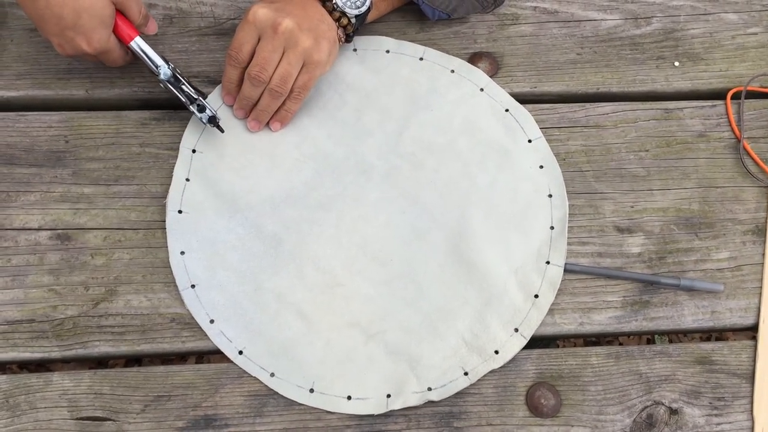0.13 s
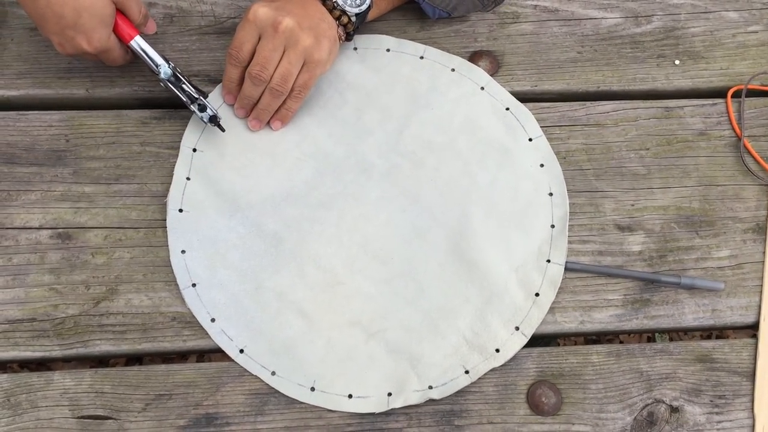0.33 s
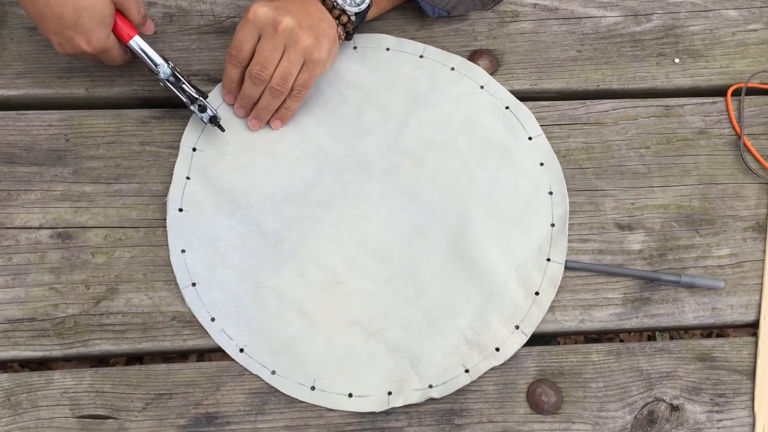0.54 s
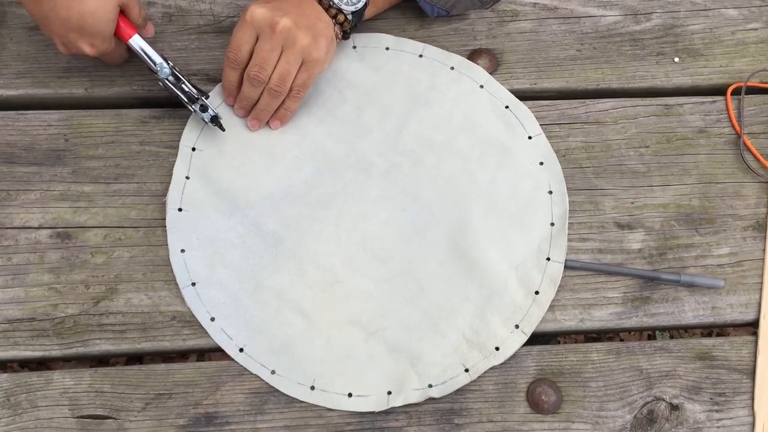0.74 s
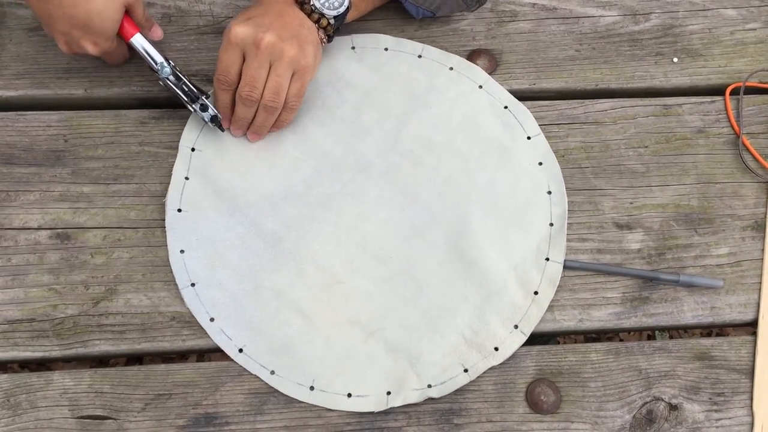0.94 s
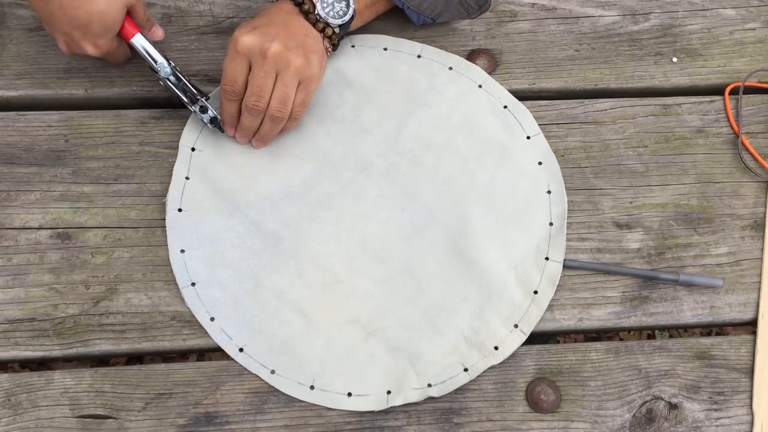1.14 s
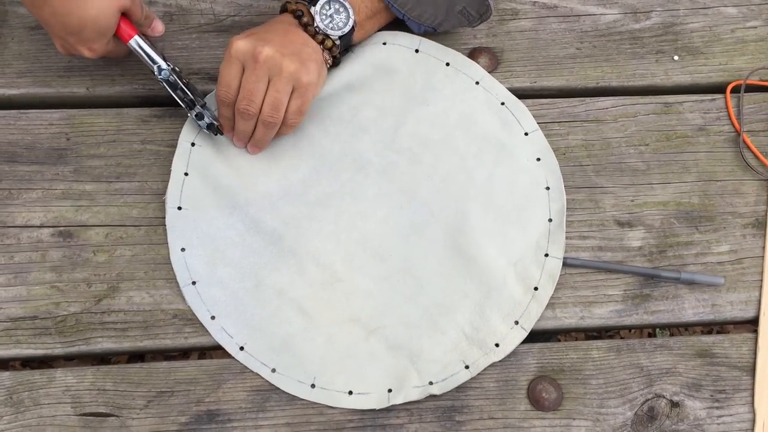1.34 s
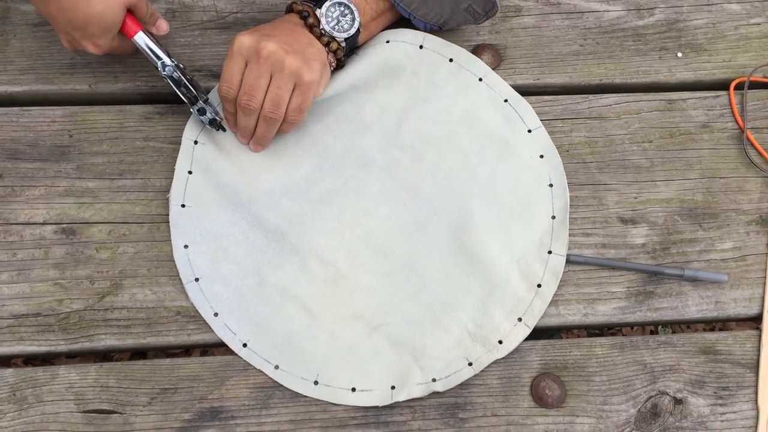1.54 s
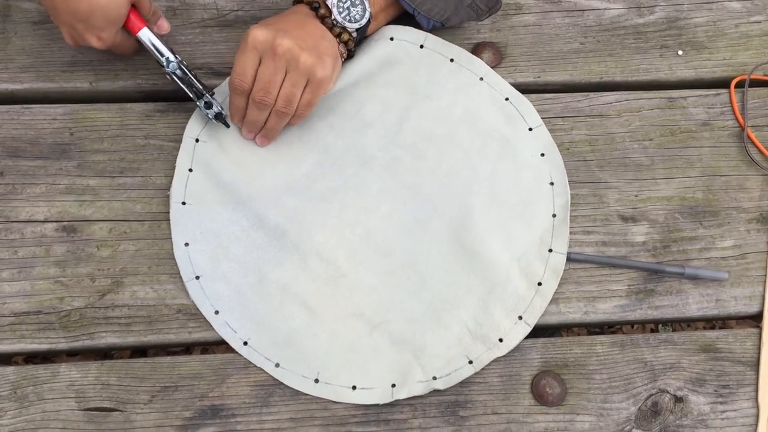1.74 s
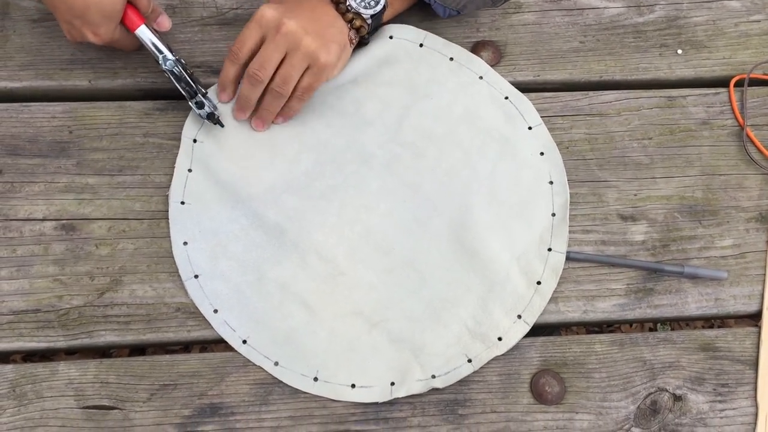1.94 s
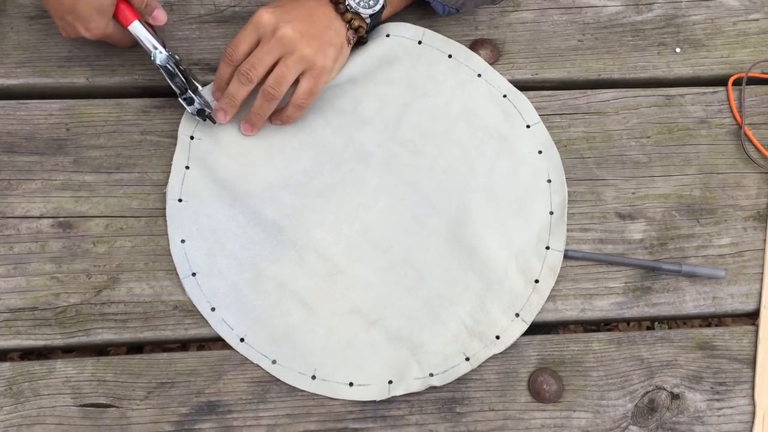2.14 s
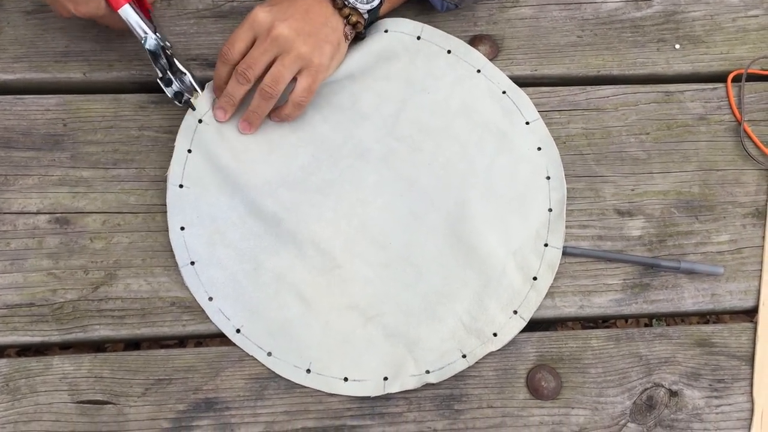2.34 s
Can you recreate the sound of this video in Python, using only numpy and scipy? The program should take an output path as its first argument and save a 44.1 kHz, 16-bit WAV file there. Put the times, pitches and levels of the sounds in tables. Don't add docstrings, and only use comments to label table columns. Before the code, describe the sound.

Close up at an outdoor plank table, quiet ticks and a light jaw click lead to a scraping rub and a sharp overloaded pliers snap, then the leather slides as it is turned and the pliers rattle open.

```python
import sys
import numpy as np
from scipy import signal
from scipy.fft import rfft, irfft, next_fast_len
from scipy.io import wavfile
from scipy.ndimage import uniform_filter1d, map_coordinates

SR = 44100
rng = np.random.default_rng(int(sys.argv[2]) if len(sys.argv) > 2 else 0)


def generate_wav(sig):
    pcm = np.round(np.clip(np.atleast_2d(sig).T, -1, 1) * 32767).astype(np.int16)
    wavfile.write(sys.argv[1], SR, pcm)


def elevation(decibels):
    levels = np.asarray(decibels, float)
    return 10 ** (levels / 20)


N = 104913

# [t/s, level/dB]
SNAP = [
    (1.1160, -9),
    (1.1165, -2),
    (1.1169, 2.5),
    (1.1174, -5),
    (1.1213, -14.5),
]
# [t/s, level/dB]
TOUCH = [
    (0.6972, -53),
    (0.6977, -20),
]
# [t/s, level/dB]
KNOCK = [
    (1.1183, 0),
    (1.1155, -9.5),
]


def unit(x):
    return x / np.sqrt(np.mean(x ** 2) + 1e-20)


def along(points, hz):
    f, v = np.transpose(points)
    return np.interp(np.log(hz + 1), np.log(f + 1), v)


def curve(rows):
    s, v = np.transpose(rows)
    return np.interp(np.arange(N) / SR, s, v)


def wobble(rate):
    return map_coordinates(rng.standard_normal(N // 40), [np.arange(N) * rate / SR])


def rush(spectrum, grit_db, rate):
    m = next_fast_len(N + SR // 2)
    x = rng.standard_normal(N) * elevation(grit_db * wobble(rate))
    colour = elevation(along(spectrum, np.fft.rfftfreq(m, 1 / SR)))
    return unit(irfft(rfft(x, m) * colour, m)[:N])


def puffs(rows, t60, rise):
    out, t = np.zeros(N + SR), np.arange(4096) / SR
    f = np.fft.rfftfreq(len(t), 1 / SR) + 1
    for s, db, hz, width in rows:
        band = np.exp(-(np.log2(f / hz) / width) ** 2)
        noise = irfft(rfft(rng.standard_normal(len(t))) * band)
        burst = elevation(-60 * t / t60) * (1 - np.exp(-t / rise)) * noise
        out[round(s * SR):][:len(t)] += elevation(db) * burst / np.abs(burst).max()
    return out[:N]


def struck(hits, modes, attack, crack, spread_db, wander_hz=14):
    out, t = np.zeros(N + SR), np.arange(SR // 2) / SR
    crack_t60_s = 0.008
    for s, db in hits:
        vary = rng.standard_normal(len(modes))
        steps = uniform_filter1d(rng.standard_normal((len(modes), len(t))), size=64)
        drift = np.cumsum(steps, 1) * np.sqrt(2 * np.pi * wander_hz / SR)
        ring = np.zeros(len(t))
        for (hz, level, t60), v, d in zip(modes, vary, drift):
            ring += elevation(level + spread_db * v - 60 * t / t60) * np.sin(2 * np.pi * hz * t + d)
        burst = crack * elevation(-60 * t / crack_t60_s) * rng.standard_normal(len(t))
        out[round(s * SR):][:len(t)] += elevation(db) * (ring * (1 - np.exp(-t / attack)) + burst)
    return out[:N]


def stroke(start, end, ramp, db):
    t = np.arange(N) / SR
    nearest_edge = np.minimum(t - start, (end - t) / 1.6)
    return elevation(db) * np.clip(nearest_edge / (2 * ramp) + 0.5, 0, 1) ** 2


def outdoors():
    # [f/Hz, level/dB per Hz]
    far = [(26, -37), (45, -2), (140, -14.5), (189, -19.5), (602, -30), (716, -28), (963, -34), (9820, -52),
           (16500, -49)]
    # [t/s, level/dB]
    wind = [(0, -51), (.68, -45.5), (.92, -33.5), (1.1, -35), (1.5, -35), (2.16, -34.5), (2.23, -44),
            (2.3, -38.5), (2.38, -42)]
    # [f/Hz, level/dB per Hz]
    buffet = [(1.2, -39.5), (2.0, 0.5), (18, 11), (30, -3.5), (54, -14.5), (120, -23), (160, -50),
              (260, -120)]
    hum = elevation(-56 + 1.5 * wobble(3.3)) * rush(far, grit_db=1.34, rate=210)
    return hum + elevation(curve(wind)) * rush(buffet, grit_db=-5.5, rate=8)


def drag_end():
    # [t/s, level/dB]
    drag = [
        (0, -53.5),
        (.05, -57.5),
        (.12, -65),
        (.4, -89),
    ]
    # [f/Hz, level/dB per Hz]
    dull_colour = [(120, -41), (200, -7.5), (308, -25.5), (345, -2), (744, 1.5), (3000, -21), (3900, -64),
                   (6600, -120)]
    return elevation(curve(drag)) * rush(dull_colour, grit_db=1.5, rate=70)


def handling():
    # [t/s, peak level/dB, centre f/Hz, width/octaves]
    ticks = [(0.232, -55, 2940, 1.5), (.238, -52.5, 3000, 0.74), (0.308, -61, 2500, 0.93),
             (0.397, -54.5, 3940, 1.5), (0.419, -63, 3960, 0.19), (0.586, -50, 1500, 3.8),
             (.594, -87, 3000, 0.68), (.645, -55, 4240, 0.46), (.709, -42, 11280, 2),
             (0.7258, -48.5, 2980, 1.3), (.853, -46, 5000, 2.9), (1.335, -47, 4670, 0.25),
             (1.43, -52, 12000, 0.95), (1.488, -48.5, 1500, 0.54), (1.627, -50.5, 2430, 0.49),
             (1.658, -52.5, 7000, 1.2), (1.8425, -39, 6340, 1.35), (1.9566, -48.5, 11300, 0.3)]
    # [t/s, peak level/dB, centre f/Hz, width/octaves]
    fumble = [(2.063, -53, 4000, 2.2), (2.085, -50, 2500, 0.48), (2.106, -51, 2960, 0.7),
              (2.126, -49, 2930, 0.36), (2.148, -54.5, 2750, 0.28), (2.183, -52, 2700, 0.66),
              (2.226, -54, 3990, 1.8), (2.261, -43.5, 2040, 0.28), (2.273, -42, 4800, 0.67),
              (2.279, -35, 1850, 0.49), (2.284, -42.5, 11000, 1.5), (2.3, -54, 8000, 1.5),
              (2.318, -45, 4800, 0.74), (2.322, -40, 12500, 0.3), (2.342, -38.5, 2020, 0.49),
              (2.341, -36, 10400, 3.8), (2.347, -38.5, 7900, 2.2), (2.376, -48, 1300, 0.92),
              (2.17, -55, 2520, .5), (2.229, -53, 900, 0.47), (2.286, -50, 2000, .8),
              (2.324, -48.5, 2900, 0.66), (2.319, -50, 1600, 0.4), (2.348, -46, 1800, 0.66),
              (2.364, -54, 3500, 1)]
    # [t/s, peak level/dB, centre f/Hz,
    # width/octaves]
    scuffs = [(.585, -56, 493, 2.4), (1.119, -32, 7000, 2), (1.1185, -20, 1500, 0.55),
              (1.146, -41, 9000, 1.55), (.699, -46, 2180, 0.75), (1.4, -54.5, 2500, 0.3),
              (1.405, -49, 2000, .8), (1.425, -46, 1404, 0.77), (1.433, -42.5, 890, 1),
              (1.455, -45.5, 590, 0.46), (2.028, -42.5, 1110, 0.88), (2.036, -45, 530, 0.38),
              (2.316, -42.5, 600, 1.75), (2.343, -45.5, 895, 1.35), (2.36, -55, 600, 0.27)]
    # [t/s, level/dB]
    thud = [
        (.782, -27.5),
        (.908, -30),
    ]
    # [f/Hz, level/dB, t60/s]
    arm = [(124, 6.5, 0.022)]
    small = puffs(ticks + fumble, t60=0.008, rise=0.0003)
    return small + puffs(scuffs, t60=0.054, rise=0.0008) + struck(thud, arm, 0.0087, 0, 0)


def pliers():
    # [f/Hz, level/dB, t60/s]
    jaw = [(1960, -5, 0.0098), (2570, -10.5, 0.0096), (2940, -7.5, 0.0083), (4750, -14.5, 0.0088),
           (5410, 8.5, 0.0025), (6360, 3, 0.0021), (8300, -9, 0.0049)]
    # [f/Hz, level/dB, t60/s]
    wheel_held = [(13100, 2, 0.024)]
    # [f/Hz, level/dB, t60/s]
    steel = [(4380, -13, 0.007), (5260, -2, .006), (6000, -3.5, 0.005), (7266, -3, 0.0076),
             (9000, -15, 0.006), (9680, -10, .006), (11990, -2, 0.004), (13240, -7, 0.0016),
             (14100, 1.5, 0.003)]
    # [t/s, level/dB]
    anvil_blow = [
        (1.1162, -7.5),
        (1.1167, 0.5),
    ]
    # [f/Hz, level/dB, t60/s]
    anvil = [(2257, -2, .008), (2460, 1, 0.0091)]
    # [f/Hz, level/dB, t60/s]
    wheel = [(12950, 0, .035)]
    touch = struck(TOUCH, jaw, 0.00048, crack=0.11, spread_db=4)
    touch += elevation(-21) * struck(TOUCH[1:], wheel_held, 0.0043, 0, 0)
    snap = struck(SNAP, steel, 0.00042, crack=0.3, spread_db=4)
    snap += struck(anvil_blow, anvil, 0.0009, 0, 0)
    return touch + snap + elevation(-9) * struck(SNAP[4:], wheel, 0.0025, 0, 0)


def planks():
    # [t/s, level/dB]
    touch_knock = [
        (0.6987, -41),
        (0.6969, -45.5),
    ]
    # [f/Hz, level/dB, t60/s]
    pad = [(504, 6.5, 0.035), (683, -9, 0.18), (747, 1, 0.058), (1060, -2, 0.024), (1280, -22, 0.059)]
    # [f/Hz, level/dB, t60/s]
    pad_against = [(236, -5, 0.095), (325, -0.5, 0.12), (383, 0, .1), (507, 0.5, 0.11), (586, -0.5, .077),
                   (907, -9.5, 0.14), (1500, -24, 0.035)]
    # [f/Hz, level/dB, t60/s]
    plank = [(302.6, -18.5, .1), (360, -25.5, .21), (532, -21.5, 0.16), (607, -13, 0.092),
             (672, -22.5, .12), (910, -11, 0.097), (1251, -25.5, .056), (1610, -28, .045),
             (1850, -30.5, .04)]
    # [f/Hz, level/dB, t60/s]
    plank_against = [(247, -19, 0.1), (405, -18, .058), (431, -2, .021), (476.7, -15, 0.15),
                     (761, -15.5, .065), (881, -14.5, 0.068), (961, -23, 0.11), (1090, -27, 0.07),
                     (1442, -27.5, 0.07), (1512, -28.5, 0.066)]
    # [f/Hz, level/dB, t60/s]
    frame = [(134, -4.5, 1), (209.3, -6, 0.48), (238.3, 4, 0.45)]
    wood = elevation(-38.5) * struck(KNOCK[:1], frame, 0.02, 0, 0)
    for hits, with_blow, against in [(touch_knock, pad, pad_against), (KNOCK, plank, plank_against)]:
        wood += struck(hits, with_blow, 0.00065, 0, 0, wander_hz=0)
        wood -= struck(hits, against, 0.001, 0, 0, wander_hz=0)
    return wood


def slide():
    # [start t/s, end t/s, ramp/s, pressure level/dB, treble level/dB]
    strokes = [
        (0.75, 1.112, 0.06, -60, -1.5),
        (0.9, 1.008, 0.019, -54.5, -7.5),
        (1.1, 1.27, 0.014, -55.5, -0.5),
        (1.257, 1.468, 0.02, -59, -3),
        (1.433, 1.58, 0.022, -68.5, 1.5),
        (1.62, 2.13, 0.023, -61.5, -0.5),
        (1.77, 1.927, 0.022, -60.5, 0.5),
        (2.2, 2.413, .015, -65, 2.5),
        (2.12, 2.214, 0.024, -70.5, 1),
        (1.558, 1.625, .02, -74, 2),
    ]
    # [f/Hz, level/dB per Hz]
    rub = [(120, -8), (350, -2), (1000, -4.5), (1900, -4), (2400, -9.5), (3200, -8.5), (4500, -19),
           (7500, -30.5), (12000, -71.5)]
    # [f/Hz, level/dB per Hz]
    nap_colour = [(2350, -37), (4000, -1), (8850, -6.5), (13300, -5.5), (16000, -18.5)]
    # [start t/s, end t/s, ramp/s, pressure level/dB]
    surges = [
        (0.884, 0.997, 0.016, -51.5),
        (1.135, 1.276, 0.016, -59),
        (1.287, 1.424, .02, -64),
        (1.77, 1.928, 0.031, -64),
        (1.97, 2.12, .02, -72.5),
    ]
    # [f/Hz, level/dB per Hz]
    scrape_colour = [(700, -30), (1300, -8.5), (1900, 1), (2500, -4), (3100, -0.5), (4300, -10),
                     (7000, -22.5), (12000, -50.5)]
    # [start t/s, end t/s, ramp/s, pressure level/dB]
    shoves = [
        (0.79, 0.935, 0.022, -60),
        (0.99, 1.101, 0.013, -63.5),
        (1.612, 1.7, .02, -77),
        (1.833, 1.958, 0.037, -57),
        (2.297, 2.407, .015, -59),
    ]
    # [f/Hz, level/dB per Hz]
    shove_colour = [(90, -28.5), (150, 5), (350, 1), (700, -2), (1400, -14.5), (2500, -28.5), (5000, -82)]
    shapes = [stroke(*row[:4]) for row in strokes]
    treble = sum(shape * elevation(row[4]) for shape, row in zip(shapes, strokes))
    nap = uniform_filter1d(treble, size=round(0.05 * SR))
    body = sum(shapes) * elevation(1.5 * wobble(39)) * rush(rub, grit_db=1.5, rate=290)
    hiss = nap * elevation(-7 + 1.2 * wobble(17)) * rush(nap_colour, grit_db=2, rate=580)
    scrape = sum(stroke(*row) for row in surges) * rush(scrape_colour, grit_db=0.5, rate=250)
    shove = sum(stroke(*row) for row in shoves) * rush(shove_colour, grit_db=2.5, rate=48)
    return body + hiss + scrape + shove


def scatter(x):
    # [f/Hz, t60/s]
    decay = [(200, 0.12), (700, 0.097), (1500, 0.095), (3000, 0.12), (15000, 0.16)]
    hz, t, z = signal.stft(rng.standard_normal(SR // 2), SR, nperseg=128)
    fading = z * elevation(-60 * t / along(decay, hz)[:, None])
    tail = signal.istft(fading, SR, nperseg=128)[1]
    return signal.fftconvolve(np.pad(x, (200, 0)), tail / np.linalg.norm(tail))[:N]


def scene():
    air = outdoors() + drag_end()
    dull = handling() + planks()
    return (air + dull + elevation(-20) * scatter(dull) + pliers() + slide())[None]


def low_pass(x):
    return signal.sosfilt(signal.butter(12, 17130, fs=SR, output="sos"), x)


def record(dry):
    ceiling, knee = 0.69, 6
    low = signal.sosfilt(signal.butter(8, 15400, fs=SR, output="sos"), dry)
    mix = low / (1 + np.abs(low / ceiling) ** knee) ** (1 / knee)
    return low_pass(mix)


dry = scene()
out = record(dry)
generate_wav(out)
```